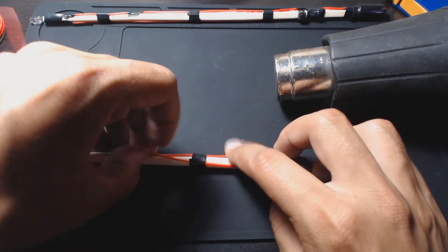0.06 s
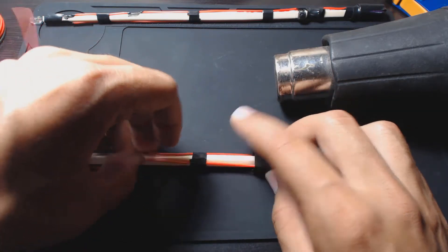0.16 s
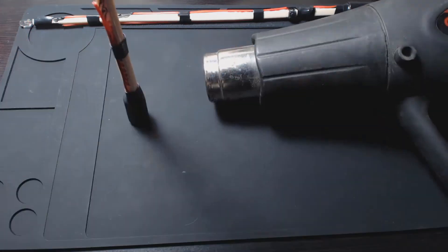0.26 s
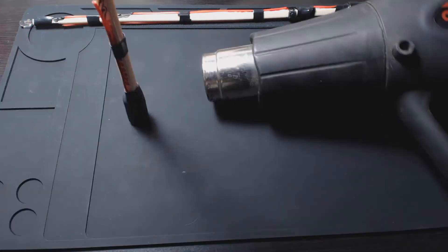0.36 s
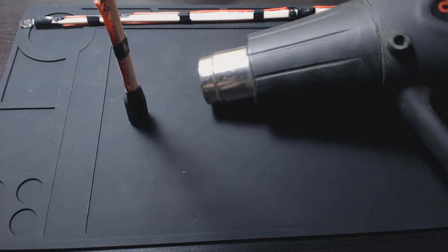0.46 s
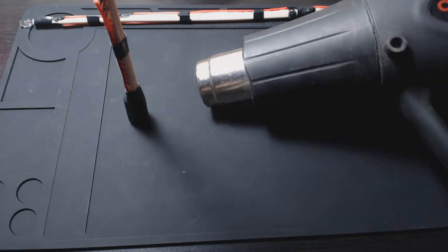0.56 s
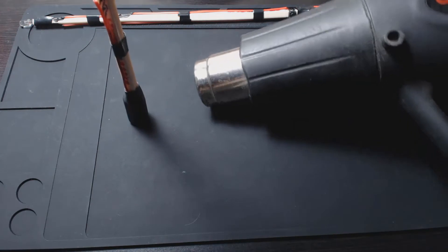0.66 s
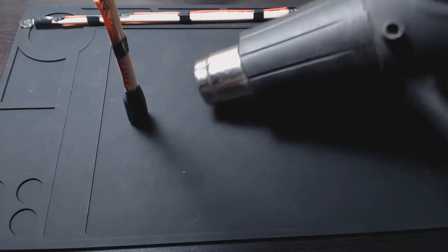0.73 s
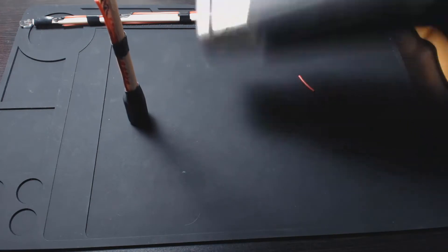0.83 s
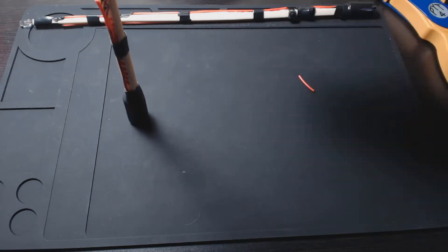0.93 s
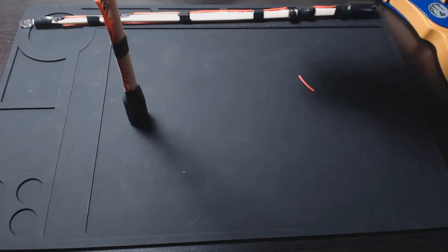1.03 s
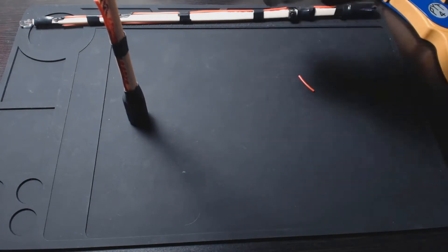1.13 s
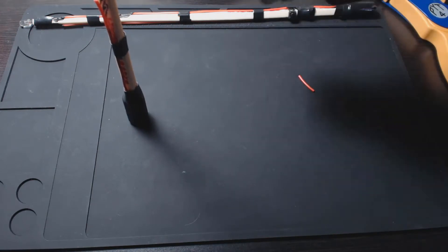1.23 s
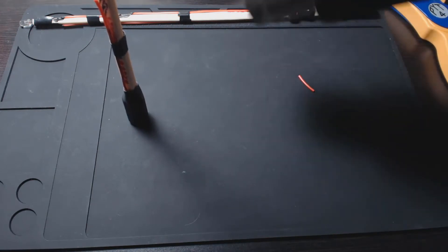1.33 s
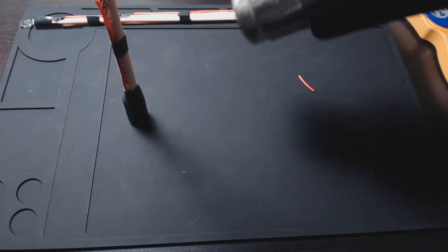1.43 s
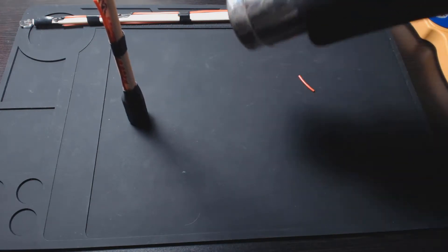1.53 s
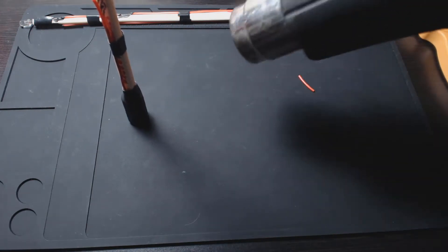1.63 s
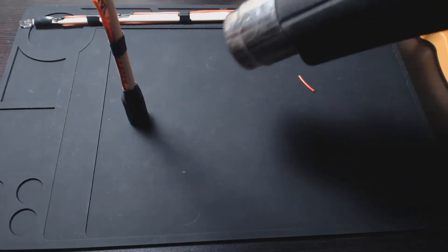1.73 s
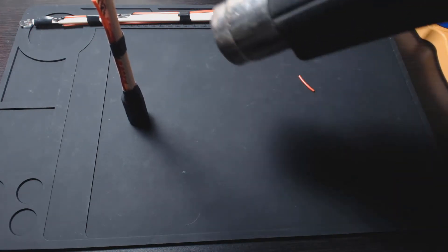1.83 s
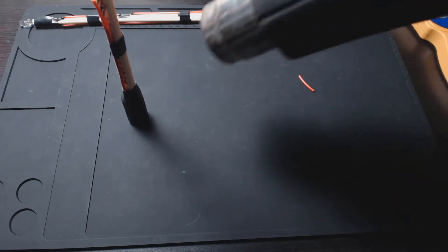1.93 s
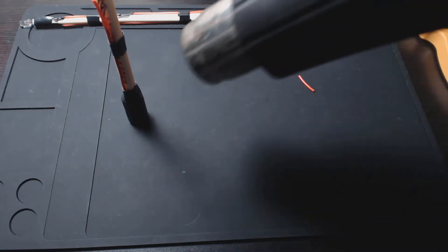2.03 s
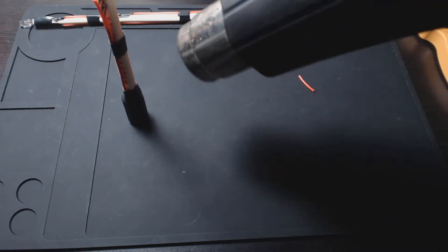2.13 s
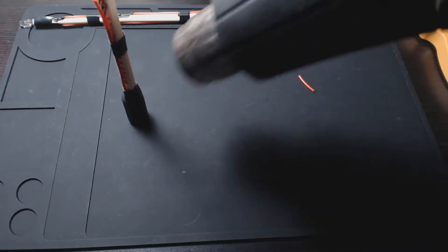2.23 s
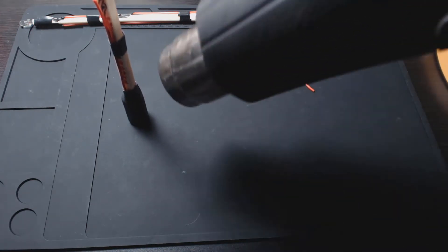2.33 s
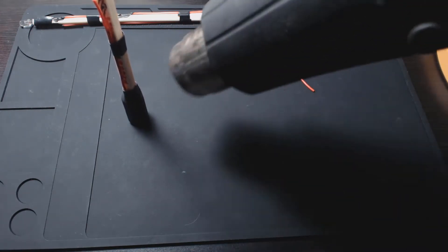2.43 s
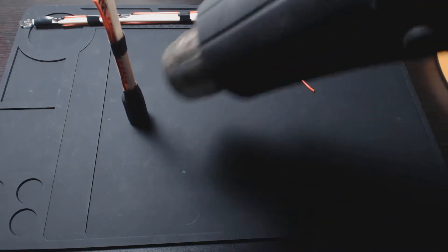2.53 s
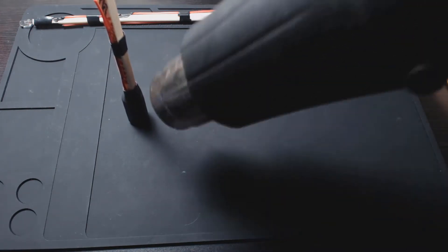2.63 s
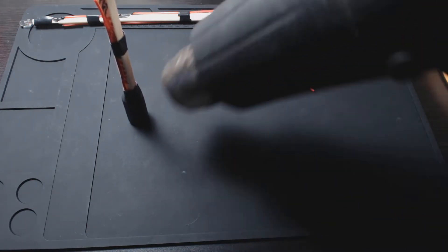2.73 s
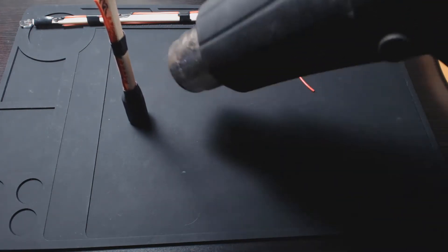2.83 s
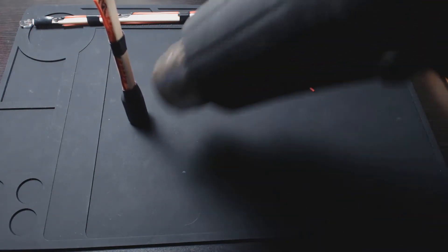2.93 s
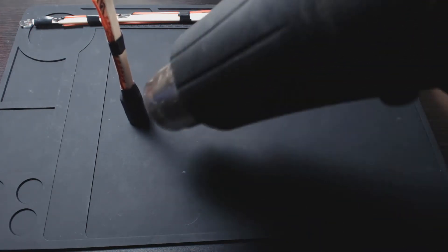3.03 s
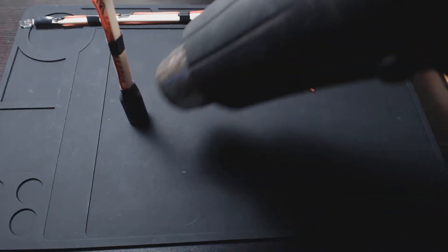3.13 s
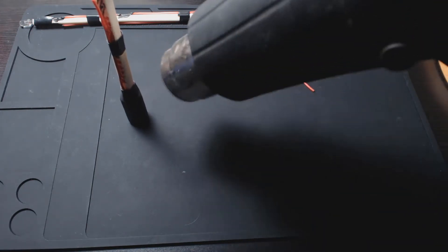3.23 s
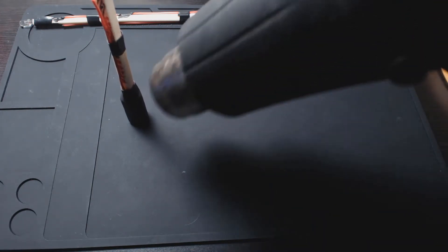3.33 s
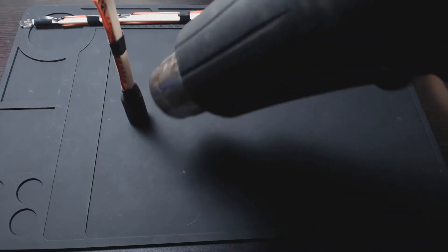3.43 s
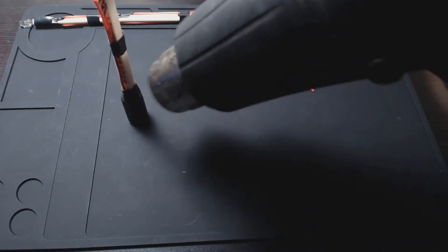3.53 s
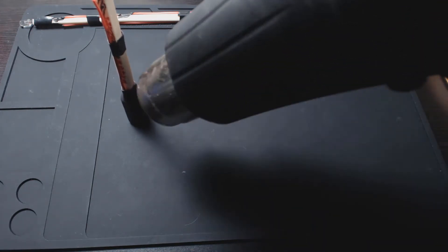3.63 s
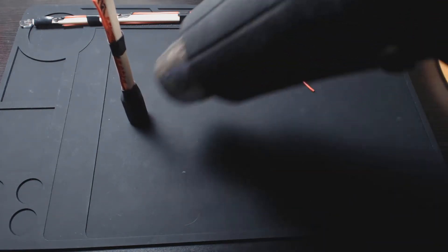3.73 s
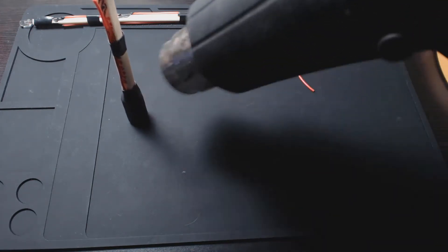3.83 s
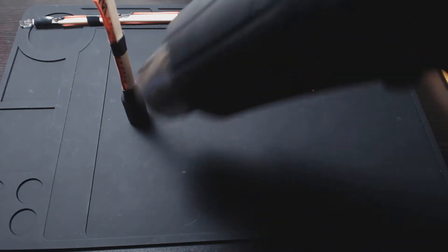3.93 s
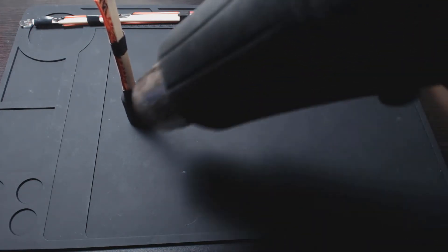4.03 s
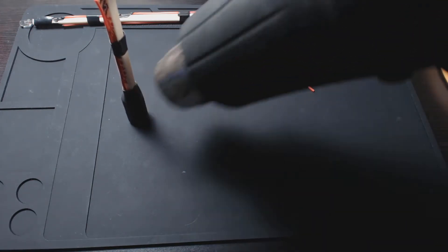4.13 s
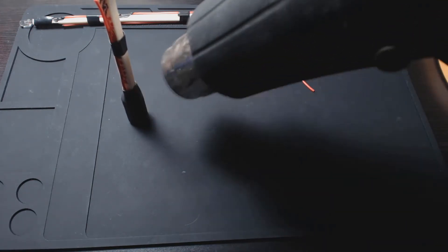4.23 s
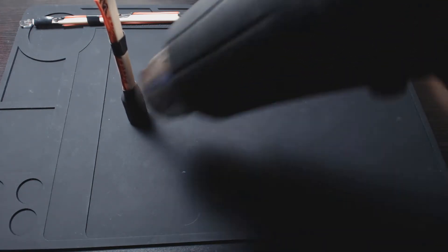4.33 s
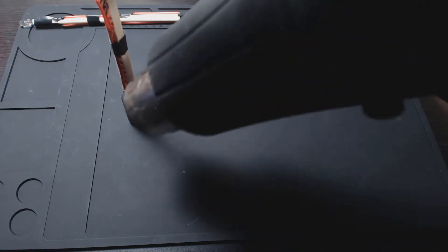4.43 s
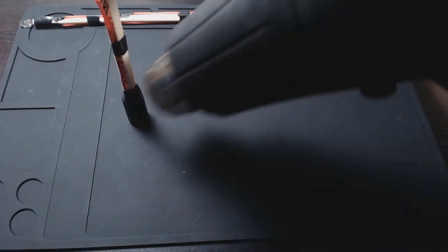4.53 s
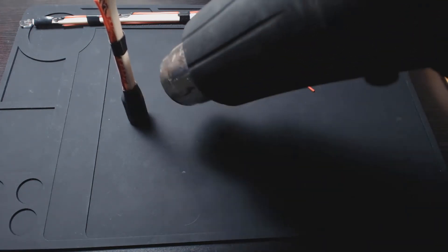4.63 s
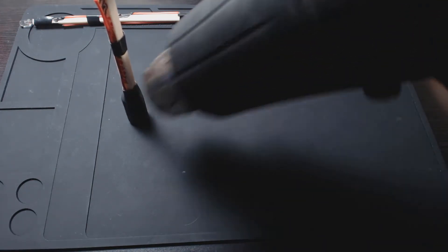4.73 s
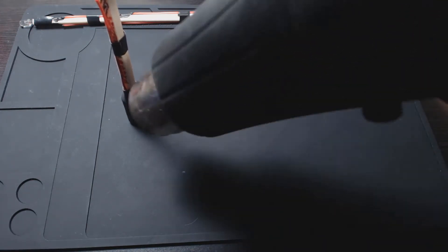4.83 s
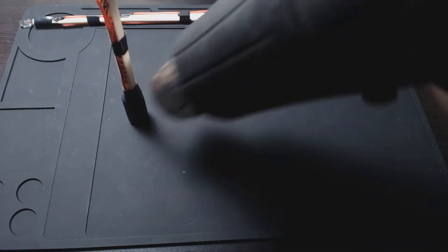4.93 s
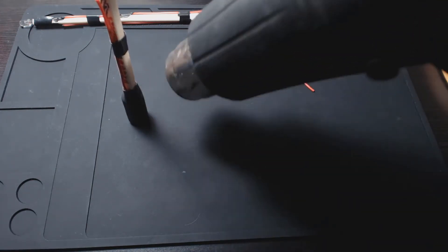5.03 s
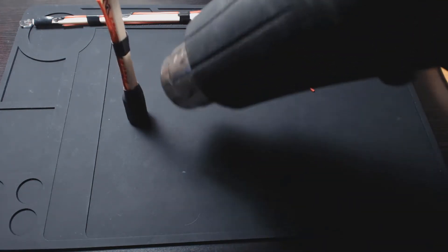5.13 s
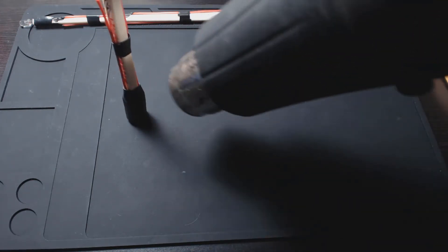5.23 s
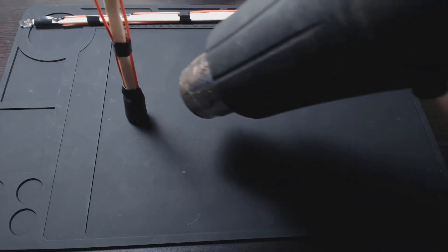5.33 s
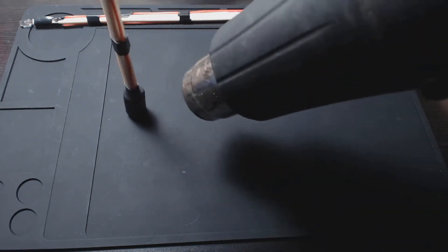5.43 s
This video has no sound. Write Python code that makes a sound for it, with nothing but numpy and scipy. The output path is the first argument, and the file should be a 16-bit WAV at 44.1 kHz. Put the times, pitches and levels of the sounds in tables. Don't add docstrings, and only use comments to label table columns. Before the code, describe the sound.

After quiet handling noises, a slide switch clicks loudly and a small motor fan spins up fast into a constant whining rush of air.

```python
import sys
import numpy as np
from scipy import signal
from scipy.fft import rfft, irfft, next_fast_len
from scipy.io import wavfile
from scipy.ndimage import uniform_filter1d

SR = 44100
rng = np.random.default_rng(int(sys.argv[2]) if len(sys.argv) > 2 else 0)


def generate_wav(signal):
    frames = np.transpose(np.atleast_2d(signal))
    scaled = np.clip(frames, -1, 1) * 32767
    pcm = np.round(scaled).astype(np.int16)
    wavfile.write(sys.argv[1], SR, pcm)


def undo_db(level):
    steps = np.asarray(level, float) / 20
    return 10 ** steps


N = 241124
STEP = 64
M = next_fast_len(N)
HZ = np.arange(M // 2 + 1) * SR / M
TOP_HZ = 15640
CHANGE_S = .303

FULL_HZ, SPIN_S = 167.06, 1.6419
QUICK_S, SLOW_S, SLOW_SHARE = .2022, .7227, .0669
RAISED_S, LOWER_S, NEAR_S, WORK_S = 2.64, 0.16, 3.1, 4.8
# [f/Hz], [power]
FAN_BANDS_HZ = (900, 3600, 9500)
FAN_POWERS = (2.47, 3, 1.25)
# [f/Hz, level/dB per Hz]
AIR = [(120, -102), (200, -98), (340, -76.5), (800, -71), (1300, -76.5), (1900, -72), (2400, -84.5),
       (4000, -79), (5500, -89), (7500, -86), (8500, -89), (10500, -100), (13000, -97.5), (15500, -94)]
# [f/Hz, width/Hz, level/dB over the rush]
CASING = [(537.8, 30, 8), (767, 72, 6.5), (1100, 310, 4.5), (2630, 450, 7.5), (3570, 110, 2.5),
          (4050, 49, 2.5), (6060, 110, 12), (6400, 820, -4.5), (5860, 120, 5), (6700, 180, 4.5),
          (6900, 330, -3), (8240, 1100, -0.5), (8900, 200, 3)]
# [f/Hz, width/Hz, level/dB raised, level/dB at the tube]
FACING = [(1170, 500, -2.5, -0.5), (2550, 580, -1.5, 1.5), (3510, 420, 4, -1.5), (5770, 960, -3, -0.5),
          (7050, 1600, -0.5, 2), (10300, 1800, -1.5, 1), (13600, 2400, -3.5, -4)]
# [shaft multiple, level/dB coming near, level/dB at the tube]
BLADES = [(3, -53, -55), (4, -54.5, -49), (5, -48, -50), (6, -46, -45.5), (7, -50, -47.5), (8, -59.5, -59),
          (9, -50, -51.5), (10, -52, -54.5), (11, -49.5, -48.5), (12, -56, -83), (14, -61.5, -62),
          (15, -56.5, -54.5), (16, -54.5, -56), (17, -89, -62), (19, -58.5, -63.5), (20, -84, -62),
          (21, -57.5, -76), (22, -64, -61), (23, -71, -73), (24, -58.5, -64), (25, -57.5, -58.5)]
# [shaft multiple, level/dB coming near, level/dB at the tube]
BRUSH = [(26, -70, -63), (27, -65, -63), (28, -73, -62), (29, -65, -64), (31, -70, -67), (32, -63, -60),
         (33, -78, -73), (34, -71, -67), (35, -74, -64), (36, -73, -65), (37, -67, -63), (38, -61, -69),
         (39, -65, -61), (40, -61, -64), (41, -73, -69), (42, -65, -64), (43, -71, -69), (46, -68, -70),
         (48, -61, -73), (49, -59, -63), (50, -61, -58), (51, -67, -67), (52, -66, -67), (53, -70, -66),
         (56, -77, -66), (57, -63, -65), (58, -70, -71), (59, -68, -66), (60, -73, -75), (61, -72, -73),
         (62, -75, -71), (63, -68, -75), (64, -74, -72), (65, -72, -71), (66, -74, -67), (67, -74, -69),
         (68, -73, -73), (69, -76, -77), (70, -78, -75), (71, -80, -75), (72, -78, -80), (73, -79, -70),
         (74, -69, -72), (75, -79, -75), (76, -74, -69), (77, -75, -67), (78, -76, -70), (79, -71, -72),
         (80, -72, -77), (81, -74, -71), (82, -77, -74), (83, -77, -75), (84, -71, -68), (85, -73, -71),
         (86, -67, -64), (87, -69, -70), (88, -67, -68), (89, -66, -71), (90, -64, -64), (91, -69, -65)]
# [shaft multiple, level/dB]
WHINES = [(13, -61.5), (18, -54.5), (30, -64), (44, -64.5), (45, -59.5), (47, -59.5), (50, -70),
          (54, -60.5), (55, -59.5), (92, -60), (93, -60)]
# [f/Hz, level/dB]
WEAK = [(160, -78), (255, -83), (330, -62.5), (2000, -57), (4500, -50), (5600, -63), (6400, -62),
        (7000, -67), (7700, -51), (8600, -61), (9200, -61.5), (10000, -67), (11700, -83), (13000, -81),
        (15500, -64.5)]
# [f/Hz, width/Hz, level/dB]
SHELL = [(2172, 8.6, 10.5), (2998, 14, 4.5), (4720, 210, 10), (5005, 42, 10.5), (7280, 270, 9),
         (7596, 73, 10.5), (8710, 55, 12.5), (9095, 260, 5.5)]
LEAD_DB = [6, 16, 2, 20, -25, 7, -5, 5, 3, -8, 20, 12, 18, -20, 0, -35]
# [f/Hz, width/Hz, level/dB]
HANDLE = [(385, 130, 8), (590, 110, -6)]

# [t/s, peak level/dB]
SLIDE = (1.6036, -25)
# [t/s, peak level/dB, pitch ratio]
SNAPS = [
    (1.6398, -9.5, 1.02),
    (1.6417, -14, 1.04),
    (1.6452, -22, 0.96),
    (1.661, -38, 0.95),
]
# [t/s, peak level/dB]
KNOCK = [
    (1.0228, -23),
]
# [f/Hz, level/dB, t60/s]
BENCH = [(125, -12, 0.08), (201, -6, 0.17), (341, 2, 0.029), (414, 2, 0.02), (550, 3.5, 0.023),
         (740, 1, 0.0067), (910, -7.5, 0.034), (1400, -1, 0.012), (1876, -9, 0.05), (2600, -8, .015),
         (3040, -12.5, 0.022), (4200, -4, 0.009), (4850, -18, 0.1), (6750, -15.5, 0.02)]
SLIDER = [(600, -12, 0.023), (1150, -14, .01), (1750, -12, .012), (2470, -6, .006), (2900, 0, .009),
          (3350, -1, .007), (4800, -10, .004), (6400, -11, .005), (8500, -14, .005), (11500, -11, .004)]
SWITCH = [(720, -18, 0.014), (1180, -17.5, 0.019), (1780, -6.5, 0.016), (2100, -2, 0.004),
          (2860, -7, 0.022), (3250, 7, 0.0015), (4200, 9, 0.0012), (5030, -2.5, 0.0069),
          (6470, -3.5, 0.0057), (6770, 3.5, 0.0022), (7720, 0.5, 0.0023), (8930, -3.5, 0.0038),
          (10450, -11, 0.005), (13000, -12, 0.005)]
# [t/s, peak level/dB, ring f/Hz, t60/s, crack
# level/dB]
TICKS = [(0.4492, -52, 1380, 0.01, -3.5), (.4504, -57, 3440, 0.01, -15), (.454, -56.5, 2100, 0.023, -12),
         (.848, -67, 3040, .01, 5), (.858, -50, 3370, 0.0087, 1), (1.011, -47, 2900, 0.0034, -10),
         (1.017, -46, 2900, 0.0044, -8), (1.026, -34, 4970, .008, -1), (1.0282, -45, 1180, .02, -9),
         (1.146, -53, 3600, 0.017, -12), (1.414, -41, 3370, 0.024, -20), (1.46, -61, 2550, .03, -14),
         (1.545, -60, 3400, .03, -2), (1.588, -46, 3270, 0.0072, 6)]
# [t/s, peak level/dB, ring f/Hz, t60/s]
TAPS = [
    (.1015, -57, 700, .07),
    (.1135, -57, 720, .05),
    (.126, -64, 800, .06),
    (.1745, -55, 770, .07),
    (.203, -65, 820, .06),
    (.337, -66, 615, .09),
]
ROOM_T60_S, ROOM_DB, ROOM_LOW_HZ, ROOM_TOP_HZ = 0.24, -9, 350, 12000

STROKE_RISE_S, STROKE_FALL_S = 0.017, 0.017
# [f/Hz, level/dB per Hz]
RUSTLE = [(880, -53), (1500, -10), (1760, -2), (2500, -3), (2790, -0.5), (3530, -1.5), (4940, -2.5),
          (6140, -10.5), (7770, -5), (15800, -18)]
# [start t/s, hold/s, level/dB, upper and top band level/dB relative to it]
STROKES = [
    (-.01, 0.036, -75, 7.5, -30),
    (.05, .24, -83, 2.5, -23),
    (.46, 0.043, -82, -2, -12),
    (0.603, 0.1, -77, 9, 12),
    (.83, 0.024, -77, -6, -19),
    (1.002, 0.066, -67, -3, -6),
    (1.08, 0.061, -67, 4.5, 8),
    (1.19, .1, -74.5, -1, -1),
    (1.395, 0.044, -67, 5, 10),
    (1.52, 0.07, -71.5, -2.5, -3),
]
# [level/dB, upper and top band level/dB relative to it]
RUSTLE_FLOOR = (-88, -2.5, -14)
# [f/Hz, width/Hz, level/dB before the change, level/dB after]
DRAG = [(3200, 250, 6, 3), (4250, 400, 8, 1.5), (5600, 300, -4, 5), (6500, 300, 6, 4),
        (7840, 370, 9.5, -0.5), (8600, 300, 3, 3), (10200, 300, -4, 3)]
# [start t/s, hold/s, level/dB]
RUBS = [
    (0, 0.036, -69.5),
    (0.106, 0.2, -73.5),
    (0.646, 0.027, -68),
    (0.853, 0.016, -68.5),
    (0.985, 0.058, -67),
    (1.174, .04, -73),
    (1.305, 0.041, -78),
    (1.57, 0.18, -70),
]
RUB_FLOOR_DB = -78.5
# [start t/s, hold/s, f/Hz, level/dB]
SCUFFS = [
    (.16, .1, 4200, -80),
    (.46, .05, 3450, -78),
    (.63, .07, 5700, -78),
    (.64, .05, 2500, -79),
    (.78, .06, 3200, -79),
    (1.16, .09, 3900, -75),
    (1.19, .07, 4800, -74),
    (1.21, .1, 2100, -75),
    (1.22, .06, 6500, -78),
    (1.51, .05, 3350, -73),
]

# [f/Hz, level/dB per Hz]
RUMBLE = [(12, -51), (17, -18), (27, -35.5), (43, -31), (64, -39), (80, -20), (102, -2.5), (130, -11.5),
          (150, -0.5), (166, -4), (216, -3), (270, -14)]
# [start t/s, hold/s, deep level/dB, low level/dB]
NUDGES = [(0.03, 0.28, -63, -84), (0.664, 0.033, -58, -62.5), (0.79, 0.11, -62.5, -64),
          (1.031, 0.029, -64, -44.5), (1.14, 0.027, -55, -67), (1.286, 0.075, -69, -67),
          (2.252, 0.034, -84, -58), (2.496, 0.13, -72, -60), (3.2, 0.059, -101, -79),
          (3.944, 0.055, -84, -76), (4.244, 0.2, -75, -60.5), (5.062, 0.24, -81, -65)]
NUDGE_RISE_S, NUDGE_FALL_S = 0.013, 0.017
RESTING_DB, LIFTED_DB, LIFT_S = (-69.5, -73), (-79.5, -72.5), 1.4
HUM_HZ, HUM_DB = (156, 171), -72


def on_log(hz, table):
    f, db = np.transpose(table)
    return np.interp(np.log(np.maximum(hz, 1)), np.log(f), db)


def peak(hz, centre, width):
    return 1 / (1 + ((hz - centre) / (width / 2)) ** 2)


def bands(db, edges):
    noise = rfft(rng.standard_normal(M)) * undo_db(db) * np.sqrt(SR / 2)
    for lo, hi in zip(edges, edges[1:]):
        yield np.sqrt(lo * hi), irfft(noise * (HZ >= lo) * (HZ < hi), M)[:N]


def colour(table, lo_hz, hi_hz):
    x = next(bands(on_log(HZ, table), (lo_hz, hi_hz)))[1]
    return x / x.std()


def slow_time():
    return np.arange(N // STEP + 2) * STEP / SR


def walk(rate):
    k = int(SR / STEP / rate)
    x = rng.standard_normal(N // STEP + 2)
    for _ in range(2):
        x = uniform_filter1d(x, k, mode="wrap")
    return x / x.std()


def fill(slow):
    return np.interp(np.arange(N), np.arange(len(slow)) * STEP, slow)


def swells(rows, rise_s, fall_s):
    t = slow_time()
    start, hold = np.transpose(rows)[:2, :, None]
    return np.exp(np.minimum(t - start, 0) / rise_s - np.maximum(t - start - hold, 0) / fall_s)


def heap(shapes, db, floor_db):
    power = np.sum((shapes * undo_db(db)[:, None]) ** 2, axis=0)
    return fill(np.sqrt(power + undo_db(floor_db) ** 2))


def ring(modes, crack_db, crack_s, crack_hz, blow=4, top_hz=15000):
    t = np.arange(SR // 3) / SR
    burst = rng.standard_normal(len(t)) * np.exp(-t / crack_s)
    burst[0] += blow
    body = np.zeros(len(t))
    for k, (hz, db, t60) in enumerate(modes):
        sense = (-1) ** k
        body += sense * undo_db(db) * np.sin(2 * np.pi * hz * t) * np.exp(-np.log(1000) * t / t60)
    body = signal.fftconvolve(body, burst)[:len(t)]
    crack = signal.lfilter(*signal.butter(2, (crack_hz, top_hz), "band", fs=SR), burst)
    x = body / abs(body).max() + undo_db(crack_db) * crack / abs(crack).max()
    return x / abs(x).max()


def add(out, s, x):
    i = int(s * SR)
    out[i:i + len(x)] += x[:N - i]


def heat_gun():
    t = slow_time()
    run = np.maximum(t - SPIN_S, 0)
    speed = 1.001 - (1 - SLOW_SHARE) * np.exp(-run / QUICK_S) - SLOW_SHARE * np.exp(-run / SLOW_S)
    full = FULL_HZ / 1.001
    shaft = full * speed * (1 + .0007 * walk(3))
    angle = 2 * np.pi * np.cumsum(fill(shaft)) / SR
    raised = np.clip(1 - (t - RAISED_S) / LOWER_S, 0, 1)
    working = np.clip((t - NEAR_S) / (WORK_S - NEAR_S), -.2, 1)
    return air_rush(speed, angle, raised, working) + motor_whine(speed, shaft, full, angle, working)


def fan_swell(hz, speed):
    return 20 * np.log10(speed) * np.interp(np.log(hz), np.log(FAN_BANDS_HZ), FAN_POWERS)


def casing_lift(hz):
    return sum(db * peak(hz, f, w) for f, w, db in CASING)


def air_rush(speed, angle, raised, working):
    out, edges = np.zeros(N), 80 * 2 ** np.arange(0, 7.8, 1 / 8)
    at_tube = np.maximum(working, 0)
    for hz, band in bands(on_log(HZ, AIR) + casing_lift(HZ), edges):
        chop = 1 + 0.6 * min(hz / 8000, 1) * np.cos(angle)
        turn = sum((raised * a + at_tube * b) * peak(hz, f, w) for f, w, a, b in FACING)
        drift = (1.0 + 1.5 * (hz > 8500)) * walk(3.5) + 0.04 * walk(36)
        out += band * chop * fill(undo_db(fan_swell(hz, speed) + turn + drift))
    return out


def motor_whine(speed, shaft, full, angle, working):
    strong = {round(k): near + (work - near) * working for k, near, work in list(BLADES) + list(BRUSH)}
    whines = {round(k): db for k, db in WHINES}
    out = np.zeros(N)
    for k in range(1, 130):
        hz, full_hz, blade = k * shaft, k * full, k < 26
        scatter, phase = rng.standard_normal(), 2 * np.pi * rng.random()
        if k in whines:
            db = whines[k] + sum(lift * peak(hz, f, w) for f, w, lift in SHELL)
            db = db + 2.2 * walk(9) + 1.6 * walk(2.5) - .5
        else:
            db = strong.get(k, on_log(full_hz, WEAK) + 1.6 * scatter)
            db = db + (1.2 if blade else 3) * walk(2.9) - (2.1 if blade else .3)
            db = db + (3.8 * speed ** 7 if blade else 2.2) * walk(30)
        db = db + fan_swell(hz, speed) + on_log(hz, WEAK) - on_log(full_hz, WEAK)
        if 3 <= k < 19:
            lead = LEAD_DB[k - 3]
        else:
            lead = -30 if k > 50 else np.interp(k, (18, 26), (-10, -55))
        db = db + (1 - speed) * lead
        if 6 <= k < 13:
            db = db - 70 * np.maximum(.6 - speed, 0)
        elif k > 50:
            db = db - np.clip(260 * (.955 - speed), 0, 10)
        if 3 <= k < 6:
            db = db + sum(lift * (peak(hz, f, w) - peak(full_hz, f, w)) for f, w, lift in HANDLE)
        if k < 12:
            db = db + .7 * (casing_lift(hz) - casing_lift(full_hz))
        gain = np.sqrt(2) * undo_db(db) * (hz < TOP_HZ)
        if k < 18:
            shake = 1.35 * speed ** 7
        else:
            shake = .85 if k == 18 else .4 + k / 600
        out += fill(gain) * np.sin(k * angle + phase + fill(shake * walk(35)))
    return out


def switch():
    out, cut = np.zeros(N), signal.butter(2, 750, "high", fs=SR)
    slide = ring(SLIDER, -6, .0025, 1500, blow=9)
    add(out, SLIDE[0], undo_db(SLIDE[1]) * signal.lfilter(*cut, slide))
    for s, db, pitch in SNAPS:
        snap = ring(np.array(SWITCH) * (pitch, 1, 1), 0, 0.0035, 1530, blow=11, top_hz=13500)
        add(out, s, undo_db(db) * signal.lfilter(*cut, snap))
    return out


def bench_knock():
    out, cut = np.zeros(N), signal.butter(2, 110, "high", fs=SR)
    for s, db in KNOCK:
        add(out, s, -undo_db(db) * signal.lfilter(*cut, ring(BENCH, -24, .0006, 500, blow=12)))
    return out


def ticks_and_taps():
    out = np.zeros(N)
    for s, db, hz, t60, crack_db in TICKS:
        modes = [(hz, 0, t60), (1.6 * hz, -6, 0.23 * t60), (2.01 * hz, -8, .6 * t60), (2.95 * hz, -12, .5 * t60)]
        add(out, s, undo_db(db) * ring(modes, crack_db, 0.002, 1400, 4, 3.2 * hz + 4000))
    for s, db, hz, t60 in TAPS:
        modes = [(hz, 0, t60), (1.7 * hz, -16, .4 * t60)]
        add(out, s, undo_db(db) * ring(modes, -30, 0.002, 1400, 12))
    return out


def room(hits):
    t = np.arange(SR // 2) / SR
    tail = rng.standard_normal(len(t)) * np.exp(-np.log(1000) * t / ROOM_T60_S) * np.clip(t / 0.00032, 0, 1)
    tail = signal.lfilter(*signal.butter(1, (ROOM_LOW_HZ, ROOM_TOP_HZ), "band", fs=SR), tail)
    tail = tail / np.sqrt(np.sum(tail ** 2))
    return hits + undo_db(ROOM_DB) * signal.fftconvolve(hits, tail)[:N]


def rustle():
    t = np.arange(N) / SR
    out, strokes = np.zeros(N), swells(STROKES, STROKE_RISE_S, STROKE_FALL_S)
    for hz, band in bands(on_log(HZ, RUSTLE), np.arange(1500, 16000, 200)):
        bright = np.clip((hz - 4500) / 3000, 0, 1)
        sheen = np.clip((hz - 11800) / 900, 0, 1)

        def tilt(level, upper, top):
            return level - 33 + bright * upper + sheen * (top - upper + 6)

        before, after = (undo_db(sum(row[col] * peak(hz, row[0], row[1]) for row in DRAG) - 2.0) for col in (2, 3))
        envelope = heap(strokes, tilt(*np.transpose(STROKES)[2:]), tilt(*RUSTLE_FLOOR))
        patches = fill(undo_db(2.8 * walk(4.0) + 2.0 * walk(40)))
        out += band * np.where(t < CHANGE_S, before, after) * envelope * patches
    return out


def mat_rub():
    shapes = swells(RUBS, STROKE_RISE_S, STROKE_FALL_S)
    friction = colour([(250, 4.5), (600, -6.5), (1500, -17.5)], 270, 1600)
    return friction * heap(shapes, np.transpose(RUBS)[2], RUB_FLOOR_DB)


def scuffs():
    out = np.zeros(N)
    for shape, (_, _, hz, db) in zip(swells(SCUFFS, STROKE_RISE_S, STROKE_FALL_S), SCUFFS):
        squeak = colour([(hz - 250, -12), (hz, 0), (hz + 250, -12)], hz - 250, hz + 250)
        out += squeak * undo_db(db) * fill(shape * undo_db(2.5 * walk(40)))
    return out


def bench_rumble():
    out, nudges = np.zeros(N), swells(NUDGES, NUDGE_RISE_S, NUDGE_FALL_S)
    lifted = slow_time() > LIFT_S
    for edge, db, rest, lift in zip(((12, 74), (72, 260)), np.transpose(NUDGES)[2:], RESTING_DB, LIFTED_DB):
        floor_db = np.where(lifted, lift, rest) + 2.7 * walk(3.9)
        out += colour(RUMBLE, *edge) * heap(nudges, db, floor_db)
    return out


def far_hum():
    on = np.arange(N) / SR > CHANGE_S
    return colour(RUMBLE, *HUM_HZ) * undo_db(HUM_DB) * on * fill(undo_db(1.0 * walk(12.0)))


def scene():
    t = np.arange(N) / SR
    hits = room(switch() + bench_knock() + ticks_and_taps())
    handling = np.clip((SNAPS[0][0] + 0.25 - t) / 0.099, 0, 1)
    dip = np.clip(abs(t - CHANGE_S) / 0.033 * (1 + 9 * (t < CHANGE_S)), 0, 1)
    bed = (rustle() + mat_rub()) * handling + bench_rumble() + far_hum()
    return np.tile(heat_gun() + hits + scuffs() + bed * dip, (2, 1))


def roll_off(x):
    return signal.sosfilt(signal.butter(12, 16860, fs=SR, output="sos"), x)


def record(dry):
    top_cut = signal.ellip(10, .3, 45, TOP_HZ, fs=SR, output="sos")
    mix = signal.sosfilt(top_cut, dry)
    return roll_off(mix)


dry = scene()
out = record(dry)
generate_wav(out)
```